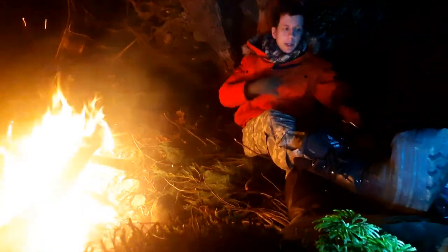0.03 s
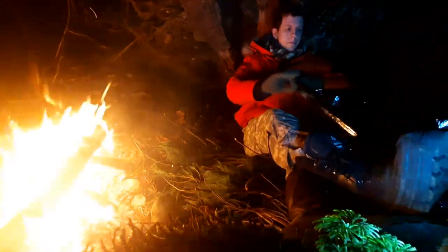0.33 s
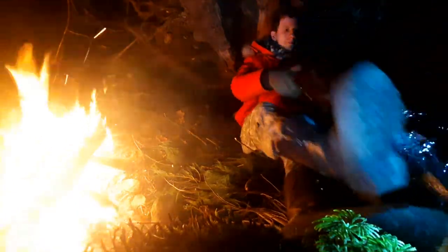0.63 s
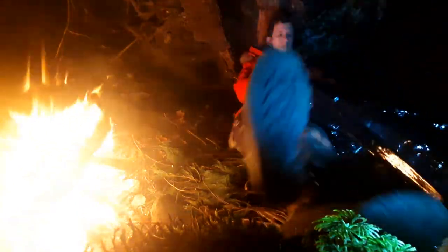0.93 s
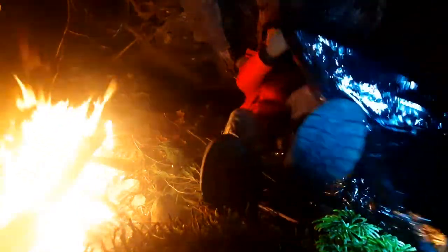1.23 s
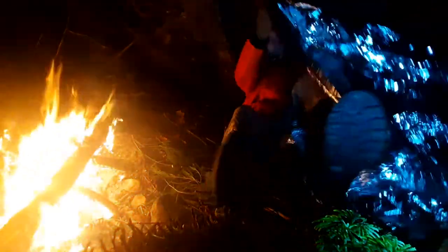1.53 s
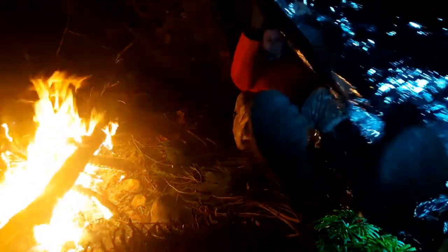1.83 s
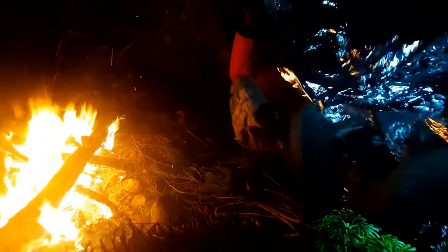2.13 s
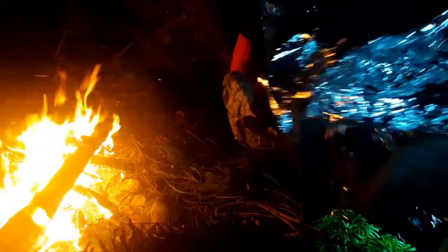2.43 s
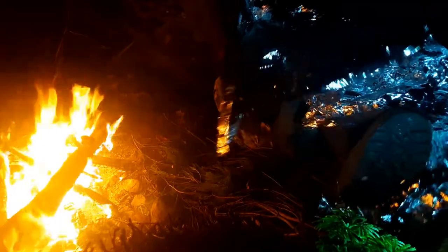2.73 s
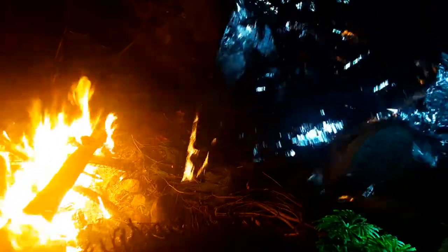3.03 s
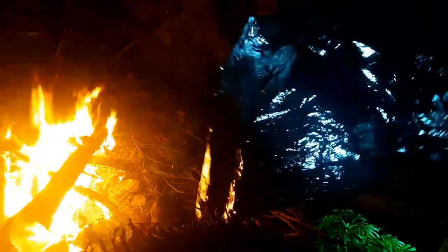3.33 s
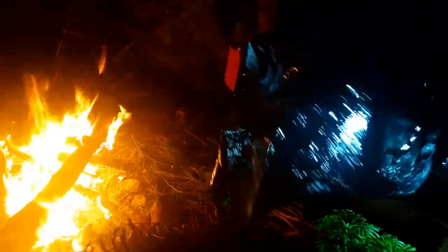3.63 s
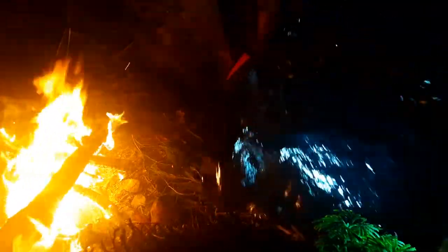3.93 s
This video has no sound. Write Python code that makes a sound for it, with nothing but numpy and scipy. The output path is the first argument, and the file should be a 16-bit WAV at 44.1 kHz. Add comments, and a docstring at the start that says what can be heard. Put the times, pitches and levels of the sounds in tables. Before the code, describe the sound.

Crisp crackling of a thin foil sheet starts loud, then suddenly gives way to quieter, uneven rustling. Soft low bumps from boots and body accompany the unfolding, outdoors beside a barely audible campfire.

```python
"""Outdoors at night, beside a campfire, a foil blanket is pulled open and spread out.
Thousands of creases buckle in the thin sheet, each radiating a click. One hears a loud pull, an abrupt
drop in level, then softer waves of rustling. Air between the folds resonates until they open, and one
patch flips with a pop. Boots, body and billowing sheet give damped low bumps; the fire hisses faintly."""
import sys
import numpy as np
from scipy import signal
from scipy.fft import rfft, irfft
from scipy.io import wavfile
from scipy.ndimage import uniform_filter1d

SR = 44100
rng = np.random.default_rng(int(sys.argv[2]) if len(sys.argv) > 2 else 0)


def dump(signal):
    """Clip the signal to [-1, 1] and save it as 16-bit WAV at the path in sys.argv[1]."""
    limited = np.clip(np.atleast_2d(signal).T, -1, 1)
    pcm = np.round(limited * 32767).astype(np.int16)
    wavfile.write(sys.argv[1], SR, pcm)


N = 176400

# Rustle envelopes before and after the level steps down. Each row: time in seconds, level in dB.
PULL_ENVELOPE = [(0.0, -32.5), (0.052, -30.5), (0.176, -26.5), (0.238, -21), (0.268, -29.5), (0.306, -28),
                 (0.408, -41), (0.605, -38.5)]
LATER_ENVELOPE = [(0.61, -55), (0.72, -56), (0.77, -49), (0.78, -56), (0.87, -60), (1.1, -45.5),
                  (1.26, -50), (1.53, -43), (1.74, -46), (1.79, -49.5), (1.86, -45), (2.01, -50.5),
                  (2.03, -47.5), (2.13, -49.5), (2.19, -47.5), (2.3, -50.5), (2.53, -47), (2.71, -51),
                  (2.75, -46.5), (3.01, -45), (3.14, -49.5), (3.53, -50), (3.61, -45.5), (3.66, -50.5),
                  (3.76, -50.5), (3.81, -46), (3.89, -43.5), (3.95, -50), (4.0, -48.5)]
# Spectra of the sheet before and after the level steps down. Each row: frequency in Hz, relative spectral
# density in dB.
PULL_SPECTRUM = [(18, -53), (30, -25), (67, -14), (130, -8.5), (359, -4.5), (467, -3), (561, -6.5),
                 (996, -7.5), (1400, -7.5), (1910, -4.5), (3880, -4), (4190, -3), (8950, -2), (10700, -12),
                 (12900, -6.5), (15500, -14.5)]
LATER_SPECTRUM = [(18, -46), (30, -26), (49, -17), (111, -14.5), (148, -6.5), (410, -4.5), (561, -5.5),
                  (1020, -4.5), (1910, -2.5), (6890, -1.5), (8500, 0), (9190, -2), (10500, -12),
                  (13300, -5), (15500, -15)]


def foil(t, drop_s=0.6087, fade_s=0.001):
    """Amplitude modulation: the crinkle swells and fades; at drop_s it steps down to a softer rustle."""
    sheet = crinkle() * undb(jerks(t))
    pull_db = np.interp(t, *np.array(PULL_ENVELOPE).T) + 0.3
    later_db = np.interp(t, *np.array(LATER_ENVELOPE).T) + 0.83
    pull = handling(sheet, PULL_SPECTRUM, pull_db) + fold_resonance(t) * undb(pull_db)
    later = handling(sheet, LATER_SPECTRUM, later_db)
    after_drop = np.clip((t - drop_s) / fade_s + .5, 0, 1)
    return pull * (1 - after_drop) + later * after_drop


def crinkle():
    """Buckling and friction: small creases tick in one band, large ones snap in all, and foil slides."""
    edges_hz = [20, 400, 900, 1800, 3000, 4500, 6500, 9000, 12000, 17000]
    hz = np.fft.rfftfreq(N, 1 / SR)
    creases = np.zeros(N)
    for low, high in zip(edges_hz, edges_hz[1:]):
        ticks = clicks(per_s=6000, scatter_db=2.5) * flicker(per_s=35.04, depth_db=1)
        creases += irfft(rfft(ticks) * ((hz >= low) & (hz < high)), N)
    snaps = sheet_scattering(clicks(per_s=1200, scatter_db=3))
    friction = rng.standard_normal(N)
    sheet = unit(creases) + undb(-6) * snaps + undb(-7.5) * friction
    return unit(sheet * flicker(per_s=60, depth_db=0.43))


def sheet_scattering(snaps, decay_s=0.0023):
    """Scattering: each snap spreads through the sheet and leaves a brief diffuse tail."""
    age = np.arange(SR // 25) / SR
    out = snaps.copy()
    for _ in range(2):
        tail = rng.standard_normal(len(age)) * np.exp(-age / decay_s)
        tail /= np.sqrt(2 * np.sum(tail ** 2))  # the two tails share unit energy
        out += undb(-7) * signal.fftconvolve(snaps * rng.choice([-1, 1], N), tail)[:N]
    return unit(out)


def handling(sheet, spectrum, level_db, crossover_hz=4800, tilt_per_db=0.21):
    """Spectral tilt: harder handling is brighter, the treble gaining on the rest as the level rises."""
    rustle = colour(sheet, spectrum)
    hz = np.fft.rfftfreq(N, 1 / SR)
    body = irfft(rfft(rustle) / (1 + (hz / crossover_hz) ** 4), N)
    treble = rustle - body
    mean_db = np.average(level_db, weights=undb(level_db) ** 2)
    tilt_db = tilt_per_db * (level_db - mean_db)
    return (body * undb(-tilt_db / 2) + treble * undb(tilt_db / 2)) * undb(level_db)


# Jerks of the sheet. Each row: start in seconds, nominal rise in dB, length in seconds.
SHEET_JERKS = [(0.155, 2, 0.01), (0.203, 4, 0.0088), (0.216, 2.5, 0.0082), (0.288, 1, 0.027),
               (0.509, 1, 0.0063), (2.474, 0.5, 0.044), (3.082, 3.5, 0.012), (3.173, 2, 0.021)]


def jerks(t, attack_s=0.002):
    """Buckling avalanches: many creases give way together; returns the brief rises in level, in dB."""
    boost_db = np.zeros(N)
    for start, rise_db, length in SHEET_JERKS:
        age = np.maximum(t - start, 0)
        boost_db += rise_db * (1 - np.exp(-age / attack_s)) * np.exp(-(age / length) ** 2)
    return boost_db


def fold_resonance(t, centre_hz=480, width_hz=62, opens_s=0.255, fade_s=0.014):
    """Cavity resonance: air between the folds rings hollow until the sheet comes open."""
    band_hz = [centre_hz - width_hz / 2, centre_hz + width_hz / 2]
    cavity = signal.butter(2, band_hz, "band", fs=SR, output="sos")
    ring = unit(signal.sosfilt(cavity, rng.standard_normal(N)))
    folded = (1 - np.tanh((t - opens_s) / fade_s)) / 2
    return undb(-20) * folded * ring


def pop(t, at_s=1.3263, width_s=0.00028, tick_decay_s=0.0011):
    """Snap-through: a patch of the sheet flips over, giving a suction, a push and a bright tick."""
    widths = (t - at_s) / width_s
    swing = widths * np.exp((1 - widths ** 2) / 2)
    tick_envelope = (t > at_s) * np.exp(-np.abs(t - at_s) / tick_decay_s)
    tick = colour(rng.standard_normal(N), LATER_SPECTRUM) * tick_envelope
    return undb(-35) * (swing + tick)


# Dull bumps. Each row: start in seconds, pitch in Hz, nominal level in dB, decay time in seconds.
SOFT_CONTACTS = [(0.303, 111, -38.5, 0.015), (1.05, 72, -50.5, 0.017), (1.132, 60, -46, 0.017),
                 (1.18, 55, -55, 0.05), (1.225, 54, -49, 0.023), (1.713, 140, -47.5, 0.014),
                 (1.735, 210, -34.5, 0.0031), (3.387, 170, -55, 0.008), (3.41, 85, -60, 0.02),
                 (3.837, 242, -36, 0.011), (3.872, 170, -48, 0.008), (3.895, 78, -46, 0.013),
                 (3.945, 75, -57, 0.012)]


def bumps(t, attack_cycles=0.45):
    """Damped oscillation: boots, body and billowing sheet give a few low cycles at each contact."""
    out = np.zeros(N)
    for start, hz, level_db, decay_s in SOFT_CONTACTS:
        age = np.maximum(t - start, 0)
        envelope = (1 - np.exp(-age * hz / attack_cycles)) * np.exp(-age / decay_s)
        out += undb(level_db) * envelope * np.sin(2 * np.pi * hz * age)
    return out


# Spectrum of the campfire. Each row: frequency in Hz, relative spectral density in dB.
FIRE_SPECTRUM = [(30, -16), (70, -2), (200, 1.5), (600, 1), (2000, -6.5), (8000, 3), (15000, -15)]


def fire():
    """Combustion noise: a faint wavering hiss with tiny crackles."""
    flame = rng.standard_normal(N) * flicker(per_s=5.8, depth_db=1.7)
    crackles = undb(-8) * clicks(per_s=40, scatter_db=3)
    return undb(-65) * colour(flame + crackles, FIRE_SPECTRUM)


def clicks(per_s, scatter_db):
    """Poisson process: random clicks of either sign, many small and a few large, at rms 1."""
    happens = rng.random(N) < per_s / SR
    size = np.minimum(rng.exponential(size=N), 5)
    return unit(happens * rng.choice([-1, 1], N) * undb(scatter_db * size))


def flicker(per_s, depth_db):
    """Random modulation: a gain that glides between random levels, with rms depth depth_db."""
    hold = max(int(SR / per_s), 1)
    steps = rng.standard_normal(N)[np.arange(N) // hold]
    glide = uniform_filter1d(uniform_filter1d(steps, hold), hold)
    return undb(depth_db * unit(glide))


def colour(x, spectrum):
    """Minimum-phase filtering: shapes x causally to (Hz, dB) points, at rms 1."""
    hz, db = np.array(spectrum, float).T
    bins_hz = np.maximum(np.fft.rfftfreq(2 * N, 1 / SR), 1)
    gain = undb(np.interp(np.log(bins_hz), np.log(hz), db))
    cepstrum = irfft(np.log(gain))
    cepstrum[1:N] *= 2  # fold negative time onto positive time
    cepstrum[N + 1:] = 0
    response = np.exp(rfft(cepstrum))
    return unit(irfft(rfft(x, 2 * N) * response)[:N])


def undb(db):
    """Decibel law: 20 dB is a factor of ten in amplitude."""
    return 10 ** (np.asarray(db) / 20)


def unit(x):
    """Normalisation to rms 1."""
    return x / np.sqrt(np.mean(x ** 2) + 1e-20)


def scene():
    """Superposition: foil, bumps, pop and fire add in the open air."""
    t = np.arange(N) / SR
    return (foil(t) + bumps(t) + pop(t) + fire())[None]


def record(dry):
    """Band limiting: the deepest bass rolls off and the highest treble is cut steeply."""
    highpass = signal.butter(2, 35, "high", fs=SR, output="sos")
    lowpass = signal.ellip(12, .2, 80, 15720, fs=SR, output="sos")
    return signal.sosfilt(lowpass, signal.sosfilt(highpass, dry))


dry = scene()
out = record(dry)
dump(out)
```